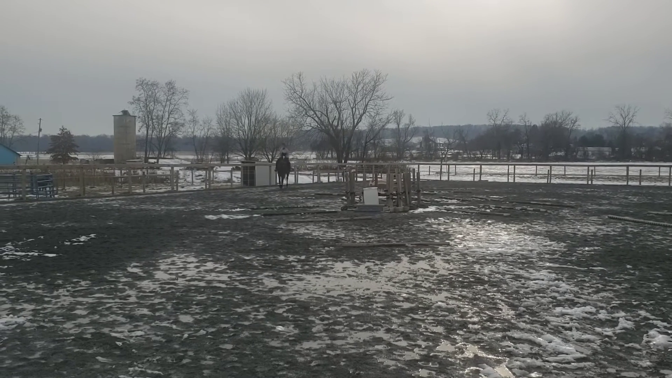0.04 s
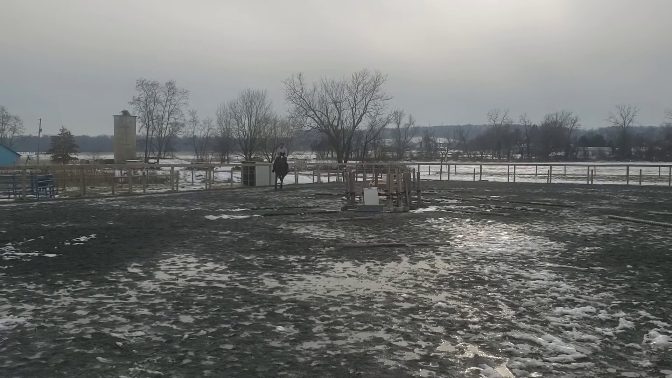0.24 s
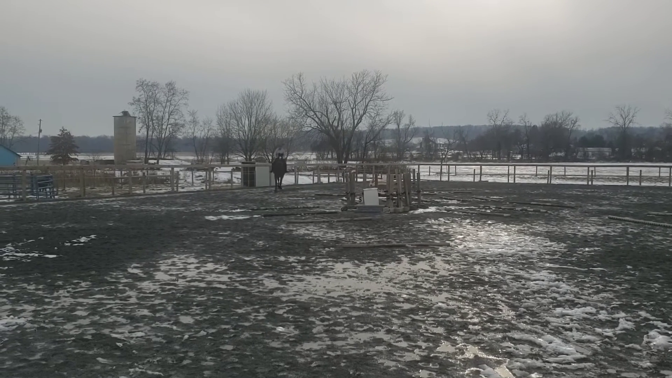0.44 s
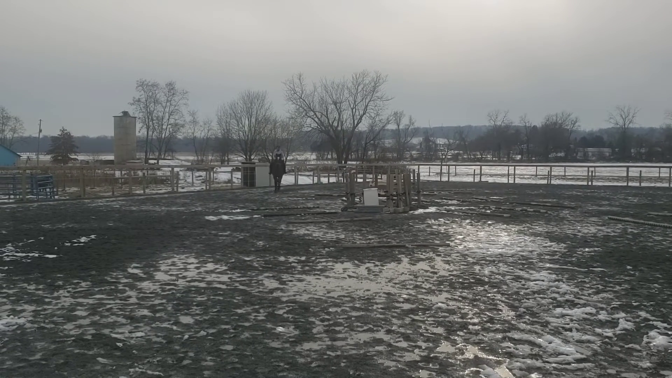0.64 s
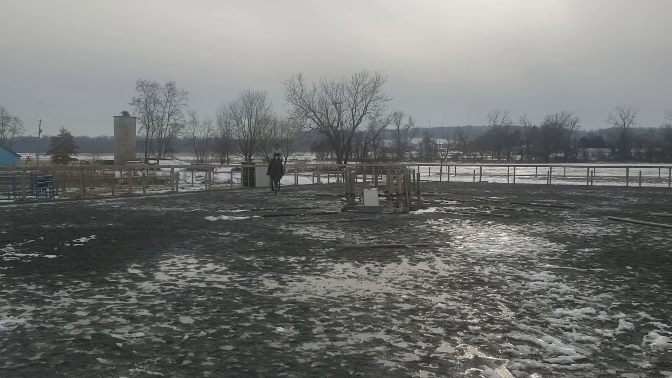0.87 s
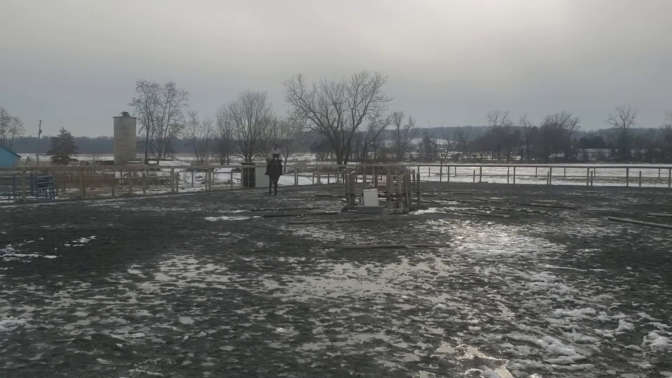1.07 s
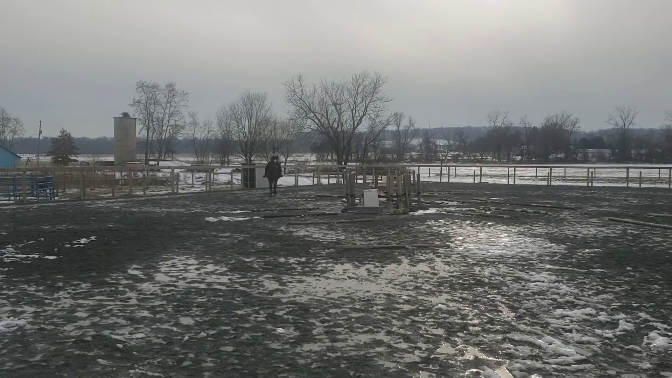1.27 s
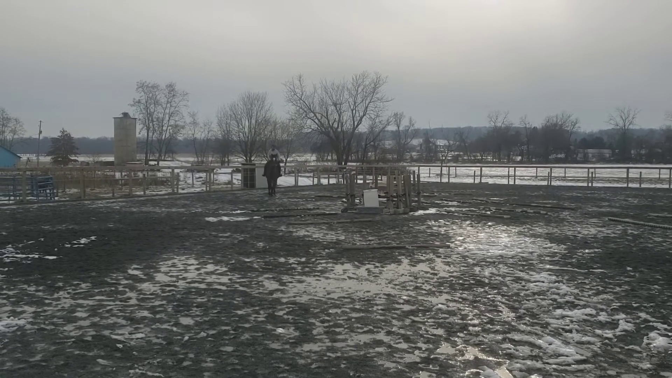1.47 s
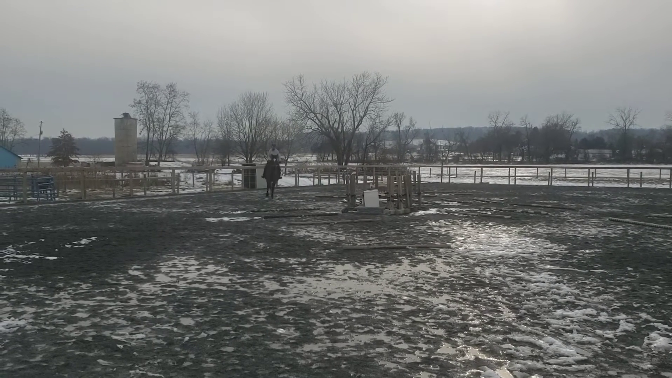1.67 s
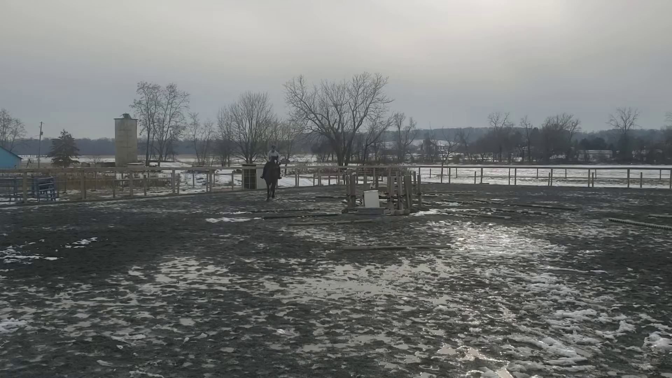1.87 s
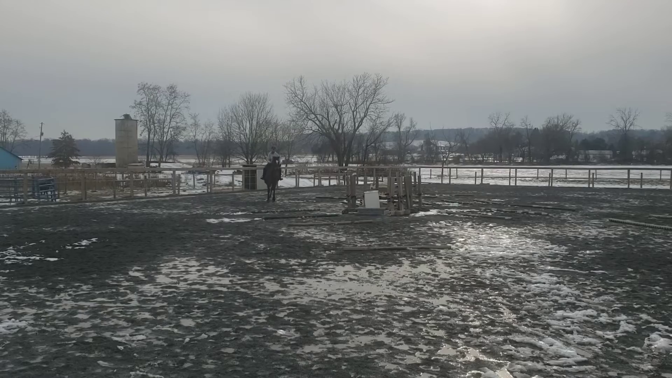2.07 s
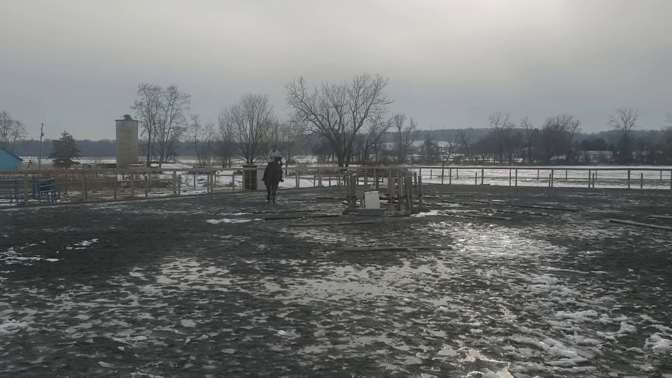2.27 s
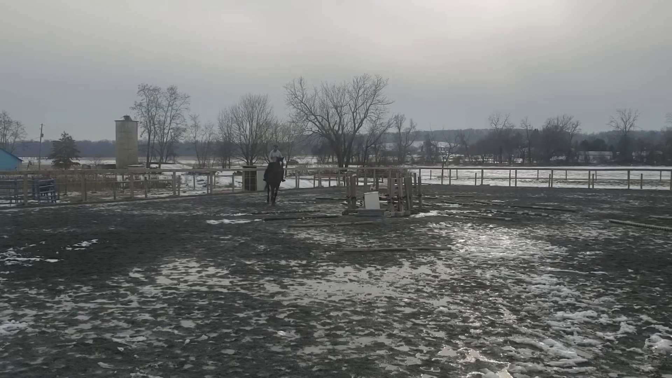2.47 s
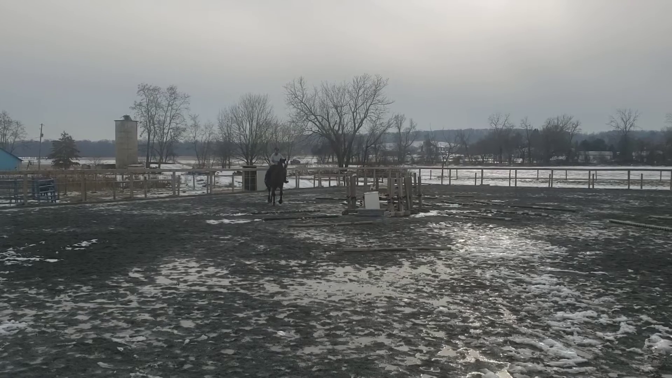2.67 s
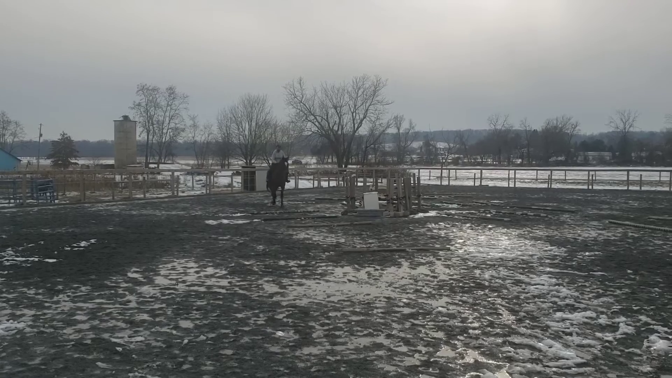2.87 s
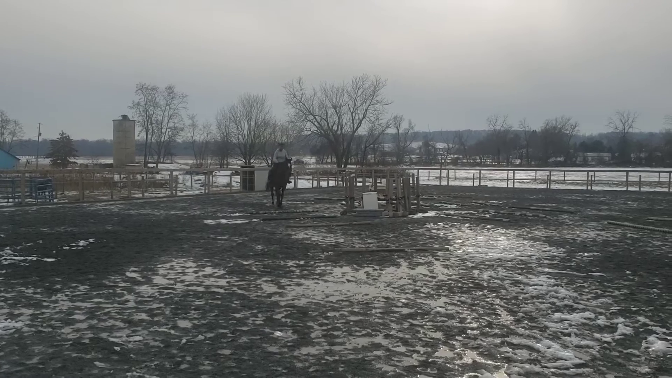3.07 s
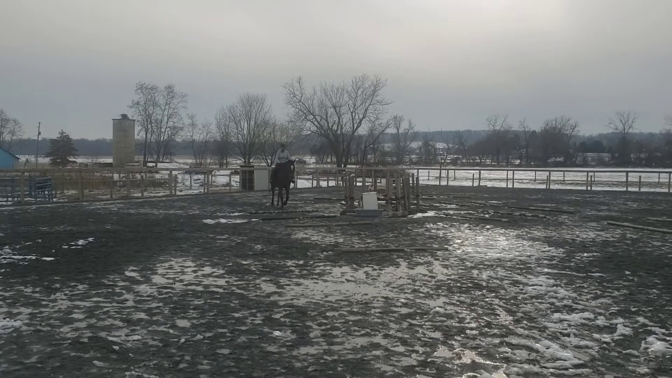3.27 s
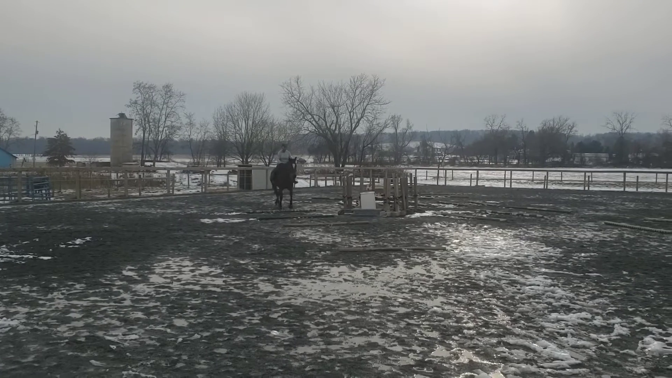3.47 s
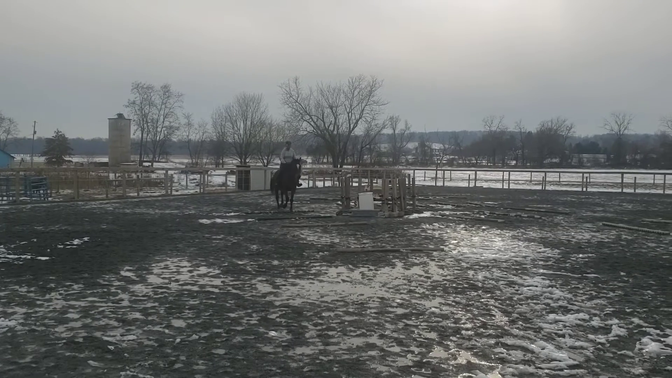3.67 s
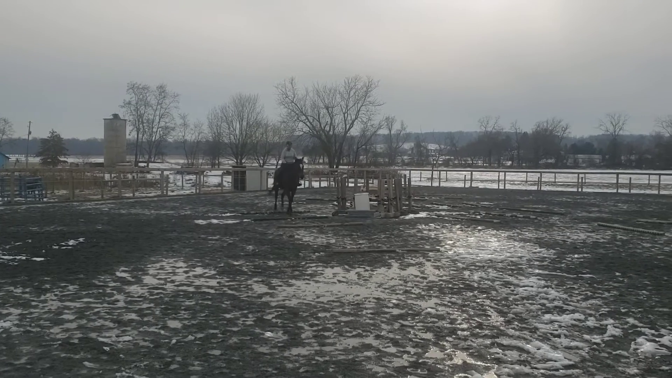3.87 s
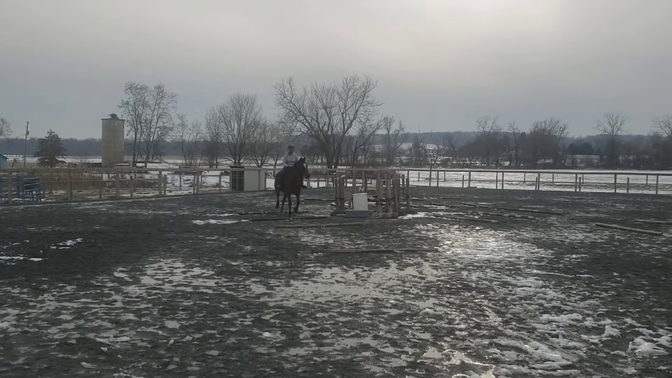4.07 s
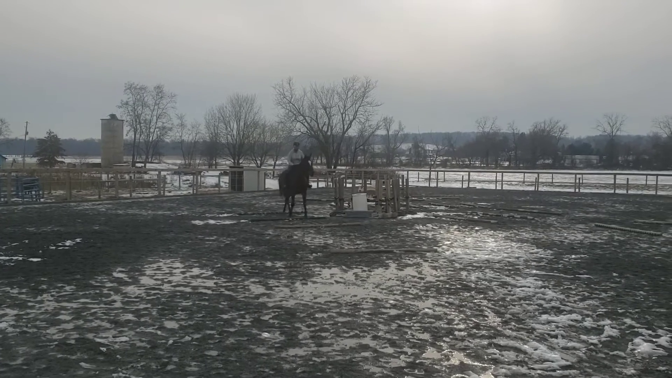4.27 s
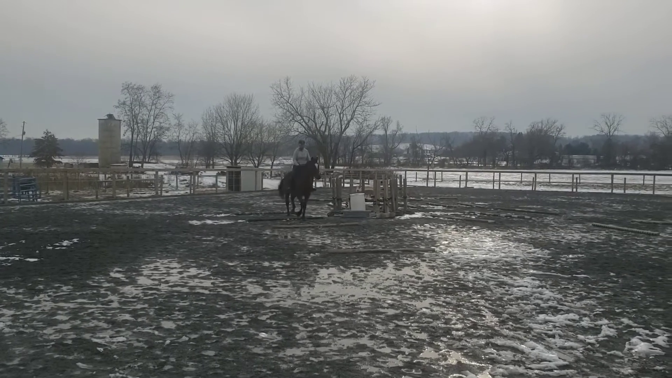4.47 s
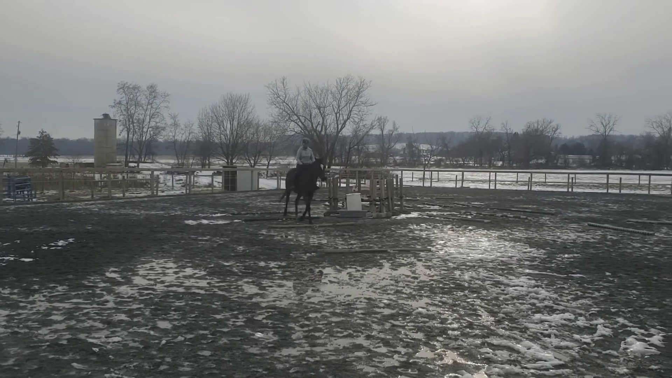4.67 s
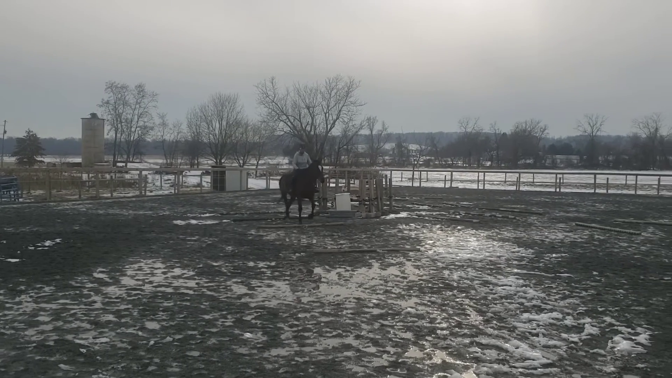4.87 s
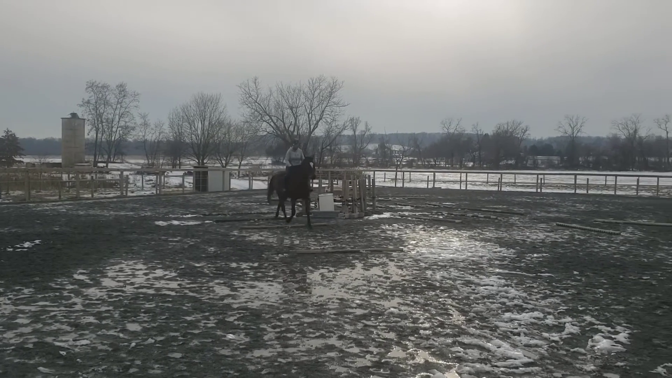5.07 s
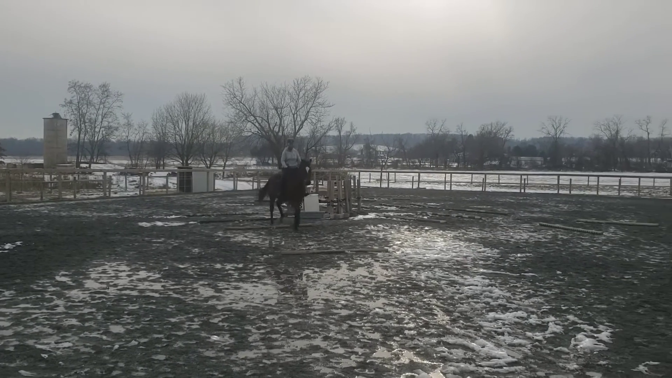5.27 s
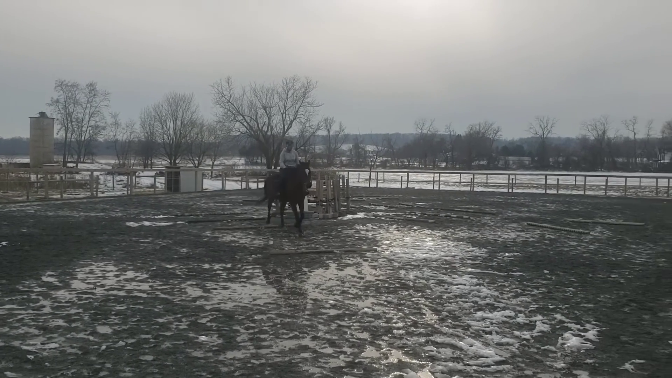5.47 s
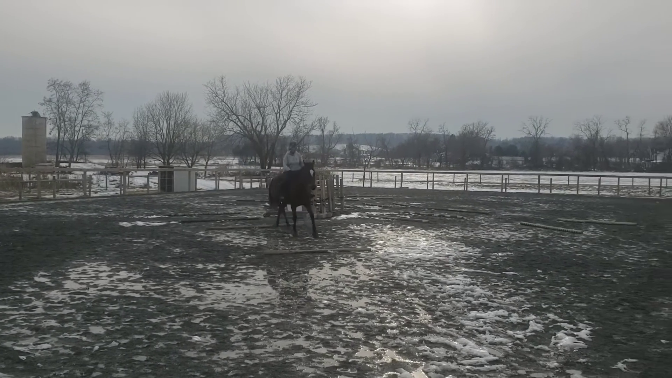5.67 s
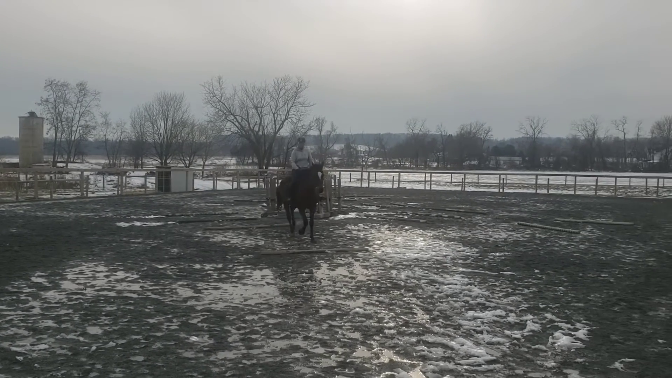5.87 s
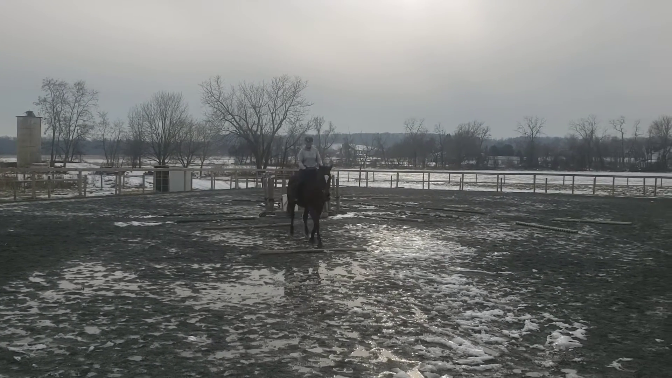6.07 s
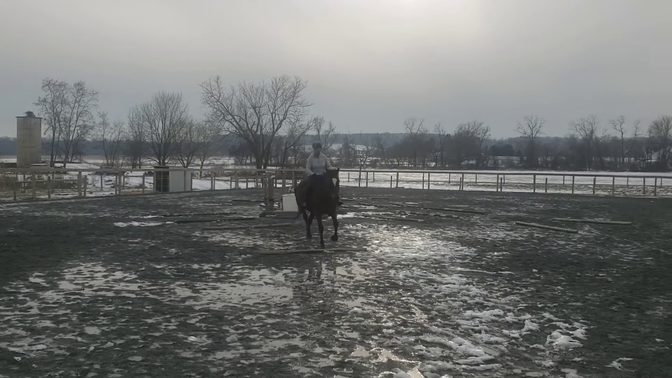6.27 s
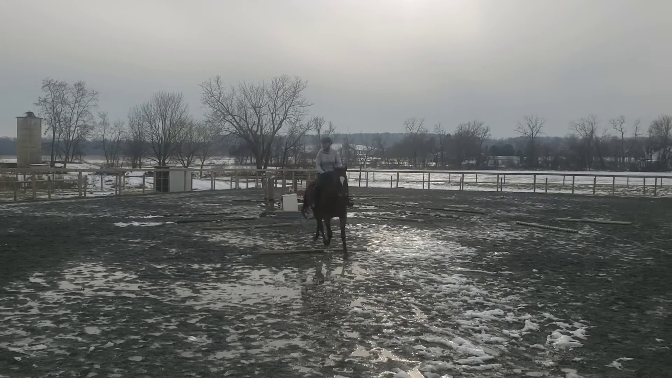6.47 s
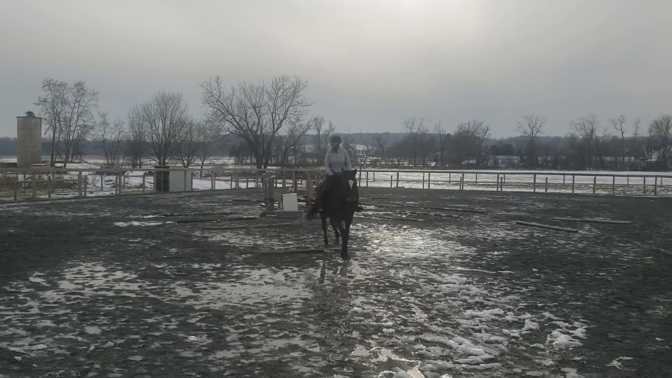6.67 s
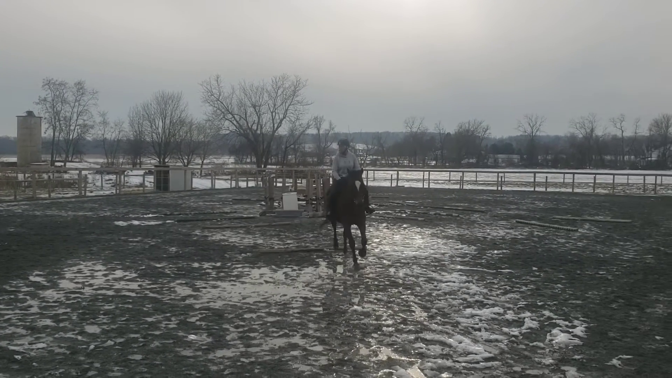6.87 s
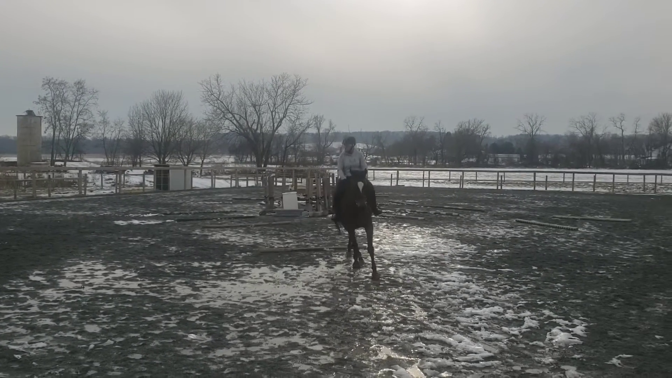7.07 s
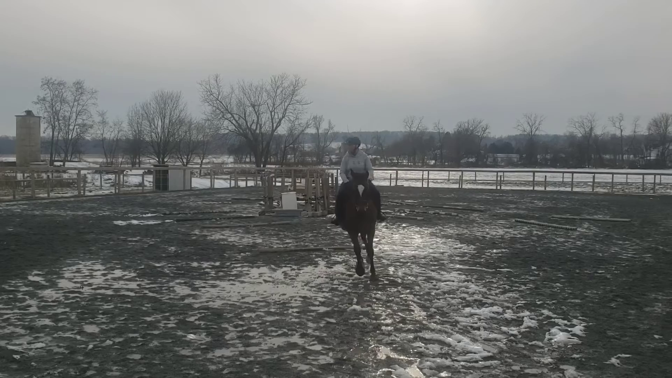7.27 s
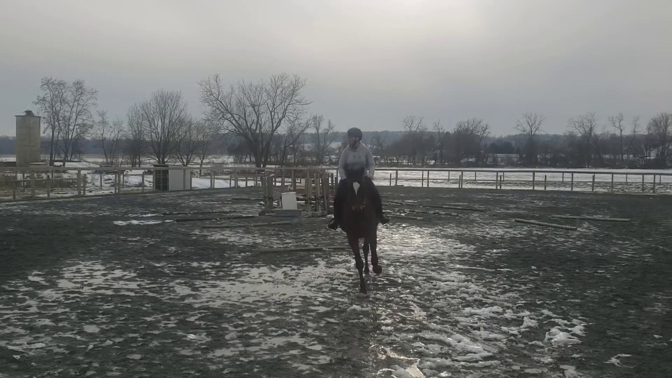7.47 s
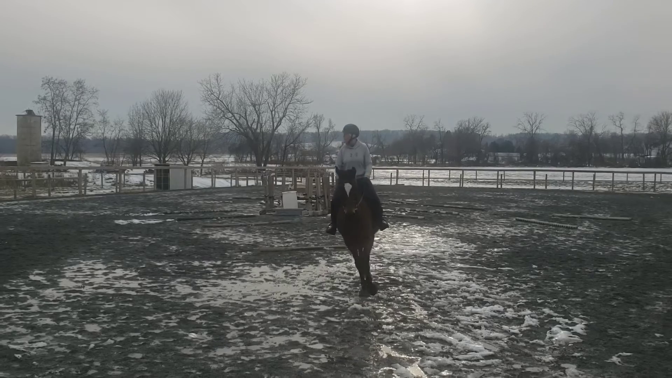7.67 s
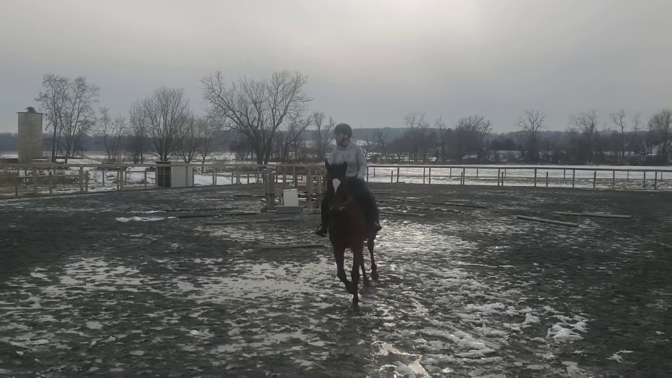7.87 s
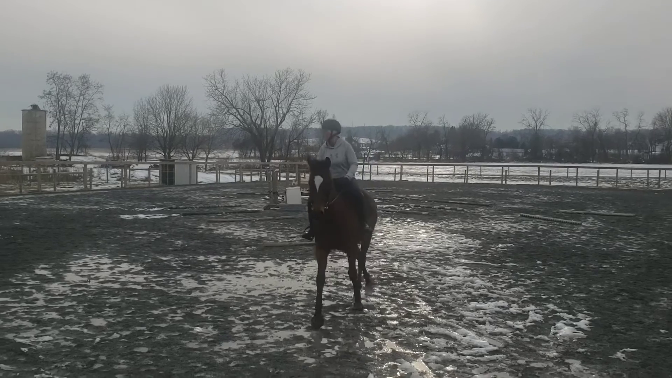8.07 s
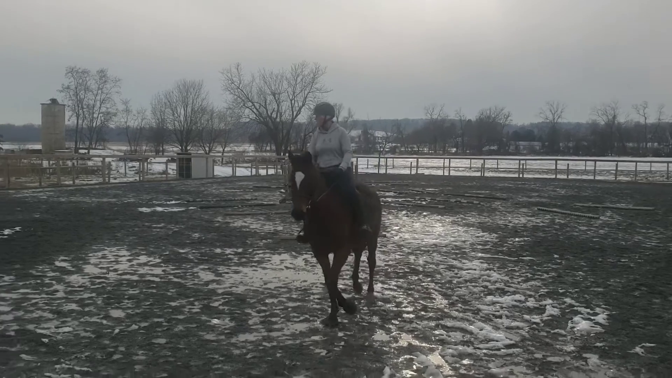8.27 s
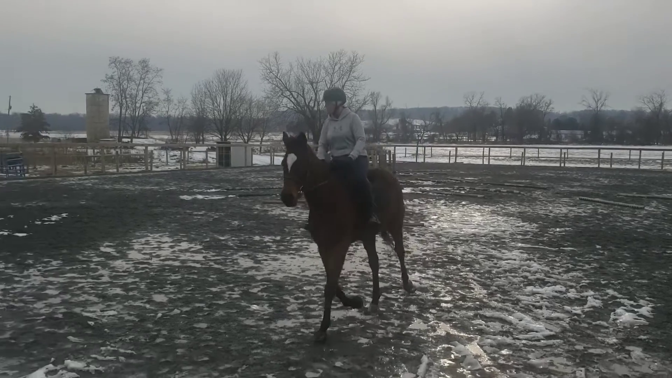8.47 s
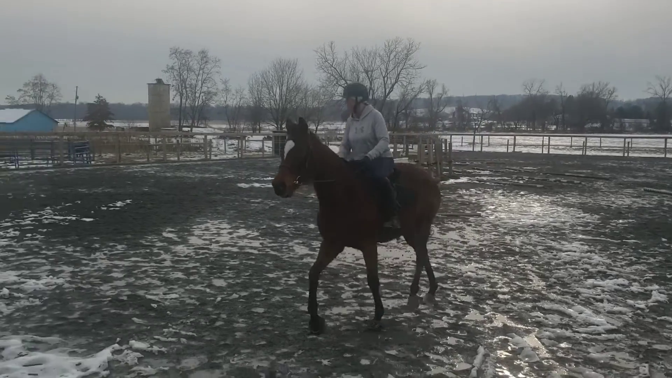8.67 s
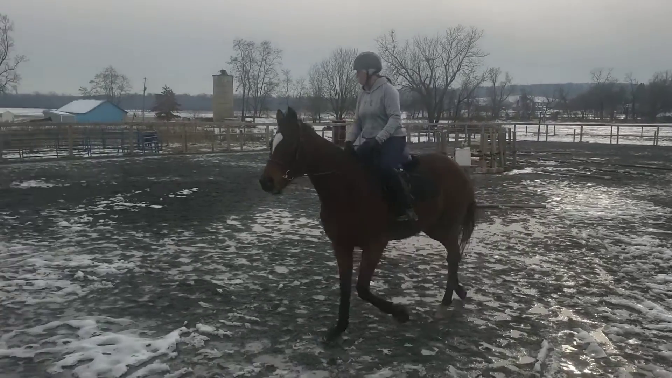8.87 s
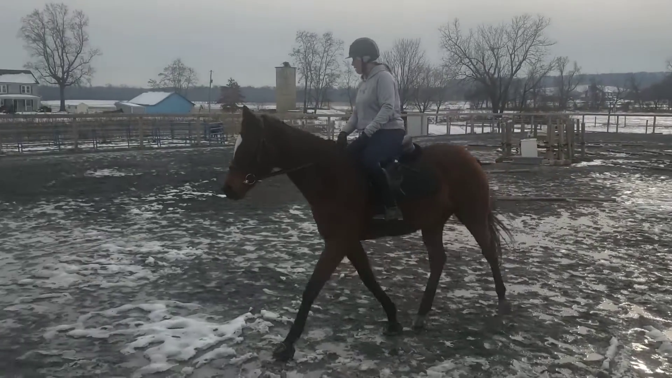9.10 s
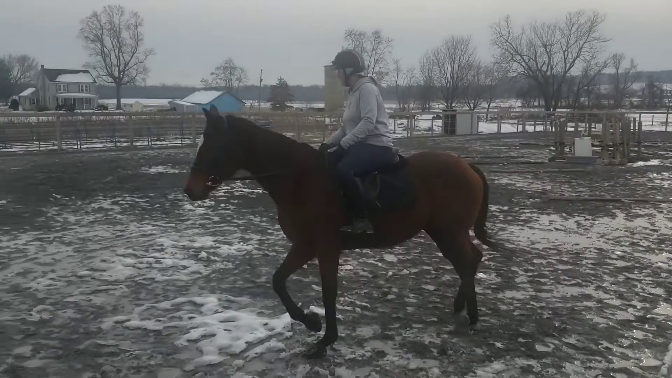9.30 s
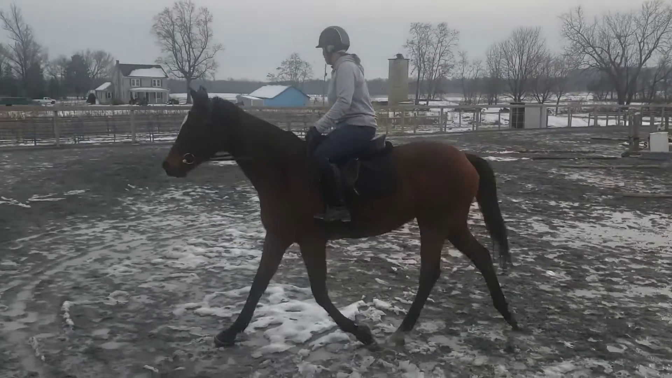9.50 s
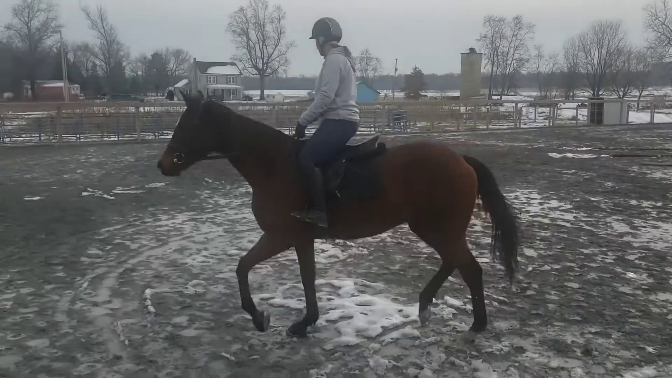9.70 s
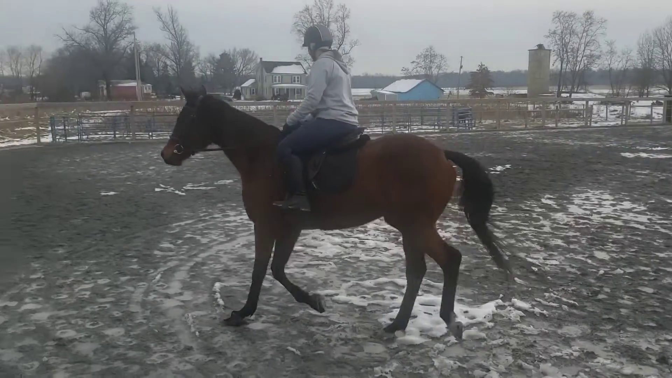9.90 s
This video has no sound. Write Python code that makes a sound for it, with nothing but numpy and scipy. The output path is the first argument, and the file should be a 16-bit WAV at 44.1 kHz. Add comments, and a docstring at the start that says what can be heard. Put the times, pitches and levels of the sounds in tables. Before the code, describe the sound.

A low outdoor rumble with a faint hiss runs throughout, along with the quiet drone of a far engine, which drops in pitch at about 4 to 5 seconds, dips briefly and carries on. From the start a horse trots in the distance over slushy ground, about three faint, wet steps a second. Each step is a dull thud, a squelch of mud and a bright spray of slush, with tiny ticks of ice. From about 5 seconds the hoofbeats grow clearly louder as the horse approaches. Thin ice snaps sharply from 5.5 seconds on, thrown drops patter down, and small plops come near 5, 6.5 and 8.7 seconds. The horse is closest and loudest just after 9 seconds, and the steps fall quicker and less evenly until the end at about 10 seconds. The right side is much duller than the left.

```python
"""Faint, wet hoofbeats come first, over a low outdoor rumble, and grow as a ridden horse trots up
across a slushy, puddled arena and turns past. Each step is a dull thud of the ground, a squelch of
mud and a spray of slush. Thin ice cracks, clods plop into puddles and thrown drops patter down.
A far engine drones and slows midway. The right microphone hears far less treble than the left."""
import sys
import numpy as np
from scipy import signal
from scipy.fft import rfft, irfft
from scipy.io import wavfile

SR = 44100
rng = np.random.default_rng(int(sys.argv[2]) if len(sys.argv) > 2 else 0)


def dump_mix(stems):
    """Bounce the given channels to the path in sys.argv[1] as a 16-bit WAV at rate SR."""
    frames = np.atleast_2d(stems).T  # one column per channel
    limited = np.clip(frames, -1, 1)  # hard clip at full scale
    pcm = np.round(limited * 32767).astype(np.int16)
    wavfile.write(sys.argv[1], SR, pcm)


N = 438354
TIME = np.arange(N) / SR

# Tone of the ground's thud, the mud's squelch and the slush's spray: f/Hz, level/dB
THUD_TONE = [(50, -20.5), (120, 6), (200, -1.5), (350, -0.5), (520, -13.5), (900, -26)]
SQUELCH_TONE = [(350, -12), (520, -8), (770, 1), (1000, -6), (1280, 2), (1480, -1), (1680, -0.5),
                (2150, -7), (2550, 2), (2930, 1), (3200, 1), (4200, -8)]
SPRAY_TONE = [(1800, -28.5), (3150, -12), (3750, -2.5), (4300, -5), (5100, -1), (5600, -4.5), (6350, -11.5),
              (7200, -3), (8400, -8), (10200, 0.5), (11400, 0), (12200, -4), (14000, -9), (16000, -17)]
# One row a step, with levels compared to an ordinary step at the same distance:
# t/s, spray/dB, squelch/dB, thud/dB, sole slap/dB, toe skim/dB, length/s, air pocket/Hz, thud/Hz
HOOF_STEPS = [(0.2,-11.5,-4,-7,-14.5,-20,0.046,650,170), (0.565,0.5,6.5,-8,6,-15,0.016,1580,170),
              (0.921,-3.5,6.5,-4,5.5,-20,0.017,1320,170), (1.28,5,3.5,3,-11,-13.5,0.015,1400,170),
              (1.613,2,3,6.5,-10,-26,.021,830,170), (1.969,-4,-1.5,-15,-2,-23,0.043,820,170),
              (2.31,-4.5,0.5,-3,10,-14,.026,744,170), (2.66,-8,-1,-11,-7,-18,0.03,1260,170),
              (2.971,-2.5,-0.5,-5,-9,-30,0.024,850,170), (3.358,0.5,0,0,-4,-34,0.013,1370,170),
              (3.726,-3.5,1,-1.5,5,-4.5,0.02,740,282), (4.102,-3,2,5,-6,-13,0.026,1310,174),
              (4.454,2,7,0,6.5,-11.5,0.019,960,170), (4.844,3,6,5.5,1.5,-11,0.017,897,186),
              (5.196,6,8,-5,11.5,-19,0.02,2500,170), (5.555,6.5,12.5,3,4.5,-13,0.016,1130,169),
              (5.891,2.5,6,1,10.5,-11.5,0.021,2630,169), (6.236,2,2.5,3.5,4,-10.5,0.014,2630,169),
              (6.563,1,4.5,-8.5,14.5,-13,0.018,2530,170), (6.916,1.5,6,0,7,-16,0.023,1400,240),
              (7.229,2,4.5,2,-12,-23,.016,1520,173), (7.569,-0.5,0.5,2.5,8.5,-12,0.013,1430,255),
              (7.892,-1,3.5,0.5,7.5,-22.5,0.021,1660,326), (8.204,2,5,-0.5,-7,-51,0.019,2900,175),
              (8.546,2,5,-1,6,-26,0.023,1370,185), (8.887,-2,-1.5,-8,7.5,-14,0.022,1700,170),
              (9.231,-4.5,-0.5,1,5.5,-17.5,0.024,2990,192), (9.317,-3,-11.5,-7,-15,-48,0.011,2930,177),
              (9.589,-1.5,-1.5,2.5,6,-14,.017,2870,227), (9.684,-3,-9.5,-1.5,-9,-46,0.0083,1800,262),
              (9.772,-18.5,-32,-8,-14,-31,0.009,3100,375), (9.849,-18,-8.5,-12,-6,-28,0.0064,1690,170),
              (9.919,-3,-2,-2,-15,-28,0.025,2960,170)]
def hooves():
    """The ground thuds, mud squelches out of the pocket under the hoof and slush sprays off."""
    out, earth = np.zeros((2, N)), noise_pair(likeness=1)
    mud = crackle(per_s=500, spread_db=-5.5, grain_s=0.0027, smooth=0.61, likeness=0.95)
    mud += gain_of(-9) * bubbles(per_s=440, low_hz=666, high_hz=3090, cycles=2.15, spread_db=4)
    slush = crackle(per_s=780, spread_db=2.5, grain_s=0.002, smooth=0.4, likeness=0.08)
    slush += gain_of(-5.5) * bubbles(per_s=1600, low_hz=3272, high_hz=13520, cycles=52, spread_db=-4.5)
    for s, spray_db, squelch_db, thud_db, slap_db, toe_db, length_s, pocket_hz, thud_hz in HOOF_STEPS:
        span = slice(max(int((s - 0.15) * SR), 0), int((s + 0.25) * SR))
        t = TIME[span] - s
        ground = ring(THUD_TONE, size=4096, peak_hz=thud_hz, peak_db=11, octaves=0.25)
        shape = step_shape(t + 0.0034, 0.64 * length_s, slap_db, toe_db - 12, tail_db=-33, tail_s=0.053)
        thud = gain_of(thud_db - 39.5) * burst(shape, earth[:, span], ground)

        pocket = ring(SQUELCH_TONE, size=4096, peak_hz=pocket_hz, peak_db=5, octaves=0.072)
        shape = step_shape(t, length_s, slap_db - 8.5, toe_db + 3, tail_db=-25, tail_s=0.07)
        squelch = gain_of(squelch_db - 34) * burst(shape, mud[:, span], pocket)

        # the hoof opens a small hollow in the slush that rings under the spray
        hollow = ring(SPRAY_TONE, size=4096, peak_hz=rng.uniform(4070, 5800), peak_db=3.5, octaves=0.04)
        shape = step_shape(t, length_s, slap_db, toe_db - 3.5, tail_db=-28, tail_s=0.41)
        spray = gain_of(spray_db - 24) * burst(shape, slush[:, span], hollow)

        splash = distance_gain(s, loss_db=26) * (squelch + spray)
        add(out, TIME[span.start], distance_gain(s, loss_db=19) * thud + splash)
    return out


def step_shape(t, length_s, slap_db, toe_db, tail_db, tail_s):
    """Loudness of a step: a toe skims, one hoof lands, its partner sinks and slaps, slush falls back."""
    before, after = np.maximum(-t, 0), np.maximum(t, 0)
    toe = gain_of(toe_db) * fade(t + 0.07, fade_s=0.12)
    first_hoof = gain_of(-4) * fade(t + 1.3 * length_s, fade_s=0.017)
    rise = np.exp(-(before / length_s) ** 1.1)
    fall = np.exp(-(after / (0.89 * length_s)) ** 1.04)
    tail = gain_of(tail_db) * np.exp(-after / tail_s)
    sink = rise * np.hypot(fall, tail)
    slap = gain_of(slap_db) * np.exp(-abs(t) / 0.0028)
    return np.sqrt(toe ** 2 + first_hoof ** 2 + sink ** 2 + slap ** 2)


def bubbles(per_s, low_hz, high_hz, cycles, spread_db, pitches=40):
    """Small bubbles ring briefly until the mud stills them; average level 1."""
    out, t = np.zeros((2, N)), np.arange(768) / SR
    for hz in np.geomspace(low_hz, high_hz, pitches):
        blip = np.exp(-t * hz / cycles) * np.sin(2 * np.pi * hz * t) * np.sqrt(hz)
        chance, when, size, side = rng.random((4, 1000))
        born = chance < per_s * TIME[-1] / pitches / len(chance)
        starts = (when[born] * (N - len(t))).astype(int)
        samples = starts[:, None] + np.arange(len(t))
        left = gain_of(-spread_db * np.log(size[born, None] + 0.0099)) * blip
        right = left * (3 * side[born, None] - 1)
        out[0] += np.bincount(samples.ravel(), left.ravel(), N)
        out[1] += np.bincount(samples.ravel(), right.ravel(), N)
    return evened(out)


# The loudest snaps of ice: t/s, level/dB, brightness/(dB per octave)
ICE_CRACKS = [(0.066, -54, -10), (0.621, -50, -8), (1.143, -53, 5), (1.281, -60, 1), (1.461, -54.5, 7),
              (1.568, -54, 4), (2.306, -50, -13), (2.583, -50.5, 6), (3.057, -51, -3.5), (3.12, -53.5, 3.5),
              (3.44, -55.5, -2), (3.905, -51, -1.5), (4.18, -54.5, -3), (4.312, -52, -3),
              (5.548, -36.5, -1), (5.628, -50, -8), (5.875, -38, -2), (6.316, -52.5, -6), (6.542, -37, 3),
              (6.912, -28.5, 3), (7.076, -41.5, 4), (7.172, -37, -7), (7.215, -29, -41), (7.396, -40.5, 2),
              (7.556, -27.5, 3), (7.75, -35.5, 5), (7.813, -41.5, -3.5), (7.872, -26, 5), (8.168, -34.5, 1),
              (8.47, -38, -1.5), (8.518, -28, -2), (8.547, -22.5, -4), (8.684, -35.5, 2), (8.893, -30, 11),
              (9.131, -41, 17.5), (9.158, -40.5, -8), (9.233, -21, 0.5), (9.355, -39, 7), (9.286, -29, 1),
              (9.544, -31, -5), (9.664, -31.5, 5), (9.803, -33, -2.5), (9.89, -29, -4)]
def ice(snap_s=0.0026, rattle_s=0.041, size=2048):
    """Each crack is a quick run of tiny breaks in a ringing shard, with a short rattle after it."""
    out, t = np.zeros((2, N)), np.arange(size) / SR
    hz, spray_db = np.transpose(SPRAY_TONE)
    treble_octaves = np.log2(np.maximum(hz, 5000) / 7000)
    body = ring(SQUELCH_TONE)[None, :size]
    shape = np.exp(-t / snap_s) + gain_of(-17) * np.exp(-t / rattle_s)
    for s, db, bright_db in ICE_CRACKS + faint_cracks():
        breaks = gain_of(4 * np.repeat(rng.standard_normal(size // 16), 16))
        split = noise_pair(likeness=0.08, size=size) * breaks * shape
        tone = np.column_stack([hz, spray_db + bright_db * treble_octaves])
        shard = ring(tone, size=size, peak_hz=5200 * rng.uniform(1, 1.35), peak_db=5, octaves=0.052)
        snap = signal.fftconvolve(split, shard[None], axes=1)
        knock = signal.fftconvolve(split, body, axes=1)[:, :snap.shape[1]]
        crack = evened(snap) + gain_of(-17) * evened(knock)
        crack *= np.sqrt(0.0061 * SR / crack.shape[1])  # db then sets the first few milliseconds
        add(out, s - 0.0005, gain_of(db) * crack)
    return out


def faint_cracks(per_s=4, db=-62.5, spread_db=6.5, tries=200):
    """Ice also chips at random moments; gives rows like those of ICE_CRACKS."""
    chance, when = rng.random((2, tries))
    size, bright = rng.standard_normal((2, tries))
    rows = np.column_stack([when * TIME[-1], db + spread_db * size, 4 * bright])
    return list(rows[chance < per_s * TIME[-1] / tries])


# Clods dropping into puddles: t/s, level/dB, f/Hz
PUDDLE_PLOPS = [(5.2, -52, 2620), (6.564, -43, 2510), (8.728, -54.5, 1290)]
def plops(fade_s=0.0013):
    """A clod traps a pocket of air that rings briefly, along with two smaller, higher ones."""
    out, t = np.zeros((2, N)), np.arange(2048) / SR
    shape = t / fade_s * np.exp(1 - t / fade_s)
    for s, db, hz in PUDDLE_PLOPS:
        pockets = sum(gain_of(pocket_db) * np.sin(2 * np.pi * hz * ratio * t)
                      for ratio, pocket_db in [(1, 10.5), (2.2, 5), (2.85, 12)])
        add(out, s, gain_of(db) * np.tile(pockets * shape, (2, 1)))
    return out


# Extra showers flung by a lifting hoof: t/s, level/dB, fade/s
SHOWERS = [(7.075, -49, 0.15), (7.4, -48, 0.2), (7.745, -55, .12), (9.35, -56, 0.17), (9.75, -48.5, .15)]
# Tone of the falling drops: f/Hz, level/dB
DROP_TONE = [(1800,-20), (3150,-10.5), (3900,-6.5), (5100,-1.5), (6400,-5), (7300,-1.5), (8400,-8.5),
             (10300,5), (12200,-2), (14000,-5), (16000,-10)]
def patter(trickle_db=-60, drops_db=-60.5, flight_s=0.041):
    """Each step throws drops and crumbs of ice that fall in clumps over a constant trickle."""
    power = gain_of(trickle_db) ** 2
    for s, spray_db, *_ in HOOF_STEPS:
        age = np.maximum(TIME - s, 0) / flight_s  # the fall is thickest at age 1
        power += gain_of(drops_db + spray_db) ** 2 * age * np.exp(1 - age)
    for s, db, fade_s in SHOWERS:
        power += (gain_of(db) * fade(TIME - s, fade_s)) ** 2
    fine = gain_of(-6) * crackle(per_s=920, spread_db=-3.5, grain_s=0.0076, smooth=0.12, likeness=0.38)
    crumbs = crackle(per_s=41, spread_db=0, grain_s=0.0035, smooth=0, likeness=0.47)
    drips = gain_of(-5.5) * bubbles(per_s=90, low_hz=4175, high_hz=12930, cycles=40, spread_db=3)
    clumps = gain_of(2.5 * wander(rate_hz=25))
    level = np.sqrt(power) * clumps * distance_gain(TIME, loss_db=16)
    return colour(level * (fine + crumbs + drips), DROP_TONE)


# The horse's path: t/s, distance/m
HORSE_PATH = [(0, 47.3), (3, 29), (5, 36.4), (6.5, 12.3), (7.5, 5.55), (8.5, 4.56), (9.3, 2.73),
              (9.94, 3.57)]
# How the trip from the far end changes its sound: f/Hz, level/dB
FAR_TONE = [(300, 9), (3000, -0.5), (5200, 8), (10500, 0), (12800, -6.5), (16000, -8.5)]
def approach(x):
    """The farther the horse, the more top treble the air takes; lows and a band near 5 kHz stand out."""
    metres, = follow(HORSE_PATH)
    far = metres / metres.max()
    far_sound = signal.oaconvolve(x, ring(FAR_TONE)[None], axes=1)[:, :N]
    return (1 - far) * x + far * far_sound


def distance_gain(s, loss_db, near_m=3.444):
    """The horse is loss_db quieter when ten times as far away; the gain is 1 at near_m."""
    metres = np.interp(s, *np.transpose(HORSE_PATH))
    return gain_of(-loss_db * np.log10(metres / near_m))


# A far engine, throttled back midway: t/s, cycle rate/Hz, level/dB
ENGINE_RUN = [(0, 31.4, -6), (1.3, 30.1, 1.5), (3.75, 32.7, -2.5), (4.6, 23.8, -3.5), (5.1, 27.3, -15),
              (6.1, 27.15, -0.5), (7.6, 26.1, 3.5), (9.94, 27.9, 4)]
# How strongly its exhaust carries each pitch: f/Hz, level/dB
EXHAUST_TONE = [(54, -54), (62, -58), (82, -50.5), (93, -61.5), (109, -51), (125, -48.5)]
def engine(hum_hz=65.2, hum_db=-55):
    """Only a far engine's low tones carry, wavering in the air, beside a low hum."""
    cycle_hz, level_db = follow(ENGINE_RUN)
    angle = 2 * np.pi * np.cumsum(cycle_hz) / SR
    drone = np.zeros(N)
    for multiple in (2, 3, 4):
        exhaust_db = np.interp(multiple * cycle_hz, *np.transpose(EXHAUST_TONE))
        level = gain_of(level_db + exhaust_db + 0.8 * wander(rate_hz=1.8))
        drone += level * np.sin(multiple * angle + 2 * np.pi * rng.random())
    hum_level = gain_of(hum_db + 2.8 * wander(rate_hz=7))
    hum_pitch = hum_hz + 0.746 * wander(rate_hz=2.26)
    hum = hum_level * np.sin(2 * np.pi * np.cumsum(hum_pitch) / SR)
    return np.sqrt(2) * (drone + hum)


# Loudness of the background: t/s, rumble/dB, rush/dB, hiss/dB
OUTDOOR_LEVELS = [(0, -53, -62, -66), (.8, -52, -62, -65.5), (1.3, -53.5, -67, -67.5),
                  (3.2, -51.5, -64, -63.5), (4.3, -49.5, -63, -60), (6.4, -52.5, -65, -61),
                  (7.6, -53, -61, -57.5), (8.1, -52.5, -65.5, -70), (9.94, -48.5, -64, -65)]
# Tone of each of the three: f/Hz, level/dB
RUMBLE_TONE = [(10, -63), (25, -13.5), (45, -4), (62, 0), (100, 0.5), (150, -5), (200, -8), (300, -15),
               (450, -20.5), (800, -35.5), (1600, -78)]
RUSH_TONE = [(250, -3.5), (520, -0.5), (780, 1.5), (1100, -5.5), (1400, -2.5), (1560, -8.5), (1800, -5),
             (2120, -16.5), (3000, -26.5), (8000, -26)]
HISS_TONE = [(1200, -21.5), (2150, -12.5), (2580, 0), (2930, -8), (3550, 6), (4100, -4), (4750, 6),
             (5500, -10.5), (6300, -8.5), (11000, -14), (16000, -34)]
def outdoors():
    """A low rumble, nearly the same on both sides, lies under a far rush and a thin, flickering hiss."""
    rumble_db, rush_db, hiss_db = follow(OUTDOOR_LEVELS)
    rumble = gain_of(rumble_db + 1.1 * wander(rate_hz=7)) * noise_pair(likeness=0.91)
    rush = gain_of(rush_db + 0.8 * wander(rate_hz=4)) * noise_pair(likeness=0.017)
    hiss = gain_of(hiss_db + 3.3 * wander(rate_hz=20)) * noise_pair(likeness=0.026)
    return colour(rumble, RUMBLE_TONE) + colour(rush, RUSH_TONE) + colour(hiss, HISS_TONE)


def gain_of(db):
    """Turns decibels into a number to multiply by."""
    return 10 ** (np.asarray(db) / 20)


def evened(x):
    """Scales a sound to an average (rms) level of 1."""
    return x / np.sqrt(np.mean(x ** 2) + 1e-20)


def fade(t, fade_s):
    """Jumps from silence to 1 at t = 0, then dies away."""
    return (t > 0) * np.exp(-abs(t) / fade_s)


def follow(rows):
    """Joins a table's points in time with straight lines, one curve a column."""
    s, *columns = np.transpose(rows)
    return [np.interp(TIME, s, column) for column in columns]


def add(mix, s, sound):
    """Mixes a stereo sound in at time s."""
    part = mix[:, max(round(s * SR), 0):][:, :sound.shape[1]]
    part += sound[:, :part.shape[1]]


def wander(rate_hz):
    """A slow random drift of typical size 1."""
    hz = np.fft.rfftfreq(N, 1 / SR)
    return evened(irfft(rfft(rng.standard_normal(N)) * np.exp(-(hz / rate_hz) ** 2), N))


def noise_pair(likeness, size=N):
    """White noise for left and right: likeness 0 is unrelated, 1 is the same."""
    left, other = rng.standard_normal((2, size))
    return np.array([left, likeness * left + np.sqrt(1 - likeness ** 2) * other])


def crackle(per_s, spread_db, grain_s, smooth, likeness):
    """Many tiny bursts of noise over a share of smooth hiss; average level 1."""
    sizes = gain_of(spread_db * np.minimum(rng.exponential(1, N), 3.5))
    clicks = sizes * (rng.random(N) < per_s / SR)
    power = signal.lfilter([1], [1, -np.exp(-2 / (grain_s * SR))], clicks ** 2)
    return np.sqrt(smooth + (1 - smooth) * power / power.mean()) * noise_pair(likeness)


def ring(tone, size=8192, peak_hz=1000, peak_db=0, octaves=0.15):
    """How something with this tone rings after one tap; peak_db makes one pitch stand out."""
    hz, db = np.transpose(tone)
    pitch = np.log2(abs(np.fft.fftfreq(size, 1 / SR)) + 1)
    peak = peak_db / (1 + ((pitch - np.log2(peak_hz)) / octaves) ** 2)
    gain = gain_of(np.interp(pitch, np.log2(hz), db) + peak)
    spectrum = np.exp(np.conj(signal.hilbert(np.log(gain))))  # no ringing before the tap
    return np.fft.ifft(spectrum).real[:size // 2]


def colour(x, tone):
    """Gives white noise a tone and keeps its power."""
    ringing = ring(tone)
    return signal.oaconvolve(x, ringing[None] / np.linalg.norm(ringing), axes=1)[:, :N]


def burst(shape, texture, ringing):
    """A shaped puff of noise that rings and carries as much energy as its shape."""
    sound = signal.fftconvolve(shape * texture, ringing[None], axes=1)
    return sound * np.linalg.norm(shape) / np.sqrt(np.sum(sound ** 2) / 2)


def scene():
    """The horse draws near in the open air, with the engine far behind."""
    horse = hooves() + ice() + plops() + patter()
    return approach(horse) + engine() + outdoors()


# The right microphone compared to the left: f/Hz, level/dB
RIGHT_MIC_TONE = [(60, -1.5), (400, -2.5), (800, -5.5), (1400, -7.5), (2200, 0), (2650, -1), (3400, -14.5),
                  (4700, -15), (5800, -10), (6800, -21), (8400, -15), (10200, -16), (12300, 1), (16000, 3)]
def record(dry, top_hz=15900):
    """The right microphone muffles much of the treble; both sides lose everything above top_hz."""
    right = signal.oaconvolve(dry[1], ring(RIGHT_MIC_TONE))[:N]
    top_cut = signal.firwin(511, top_hz, window=("kaiser", 9), fs=SR)
    return signal.oaconvolve(np.array([dry[0], right]), top_cut[None], "same")


dry = scene()
out = record(dry)
dump_mix(out)
```